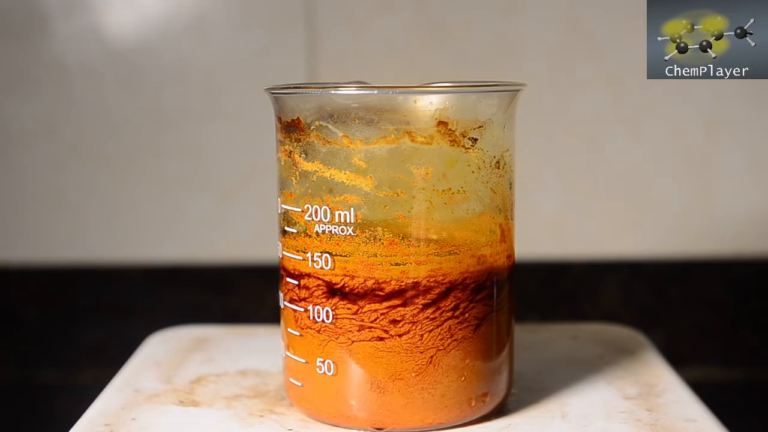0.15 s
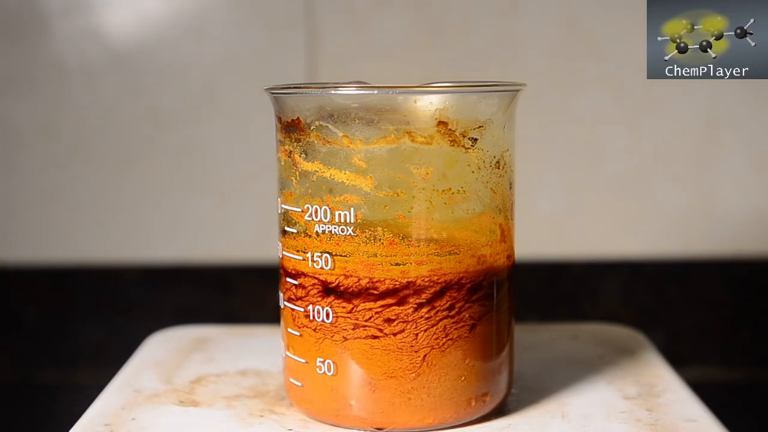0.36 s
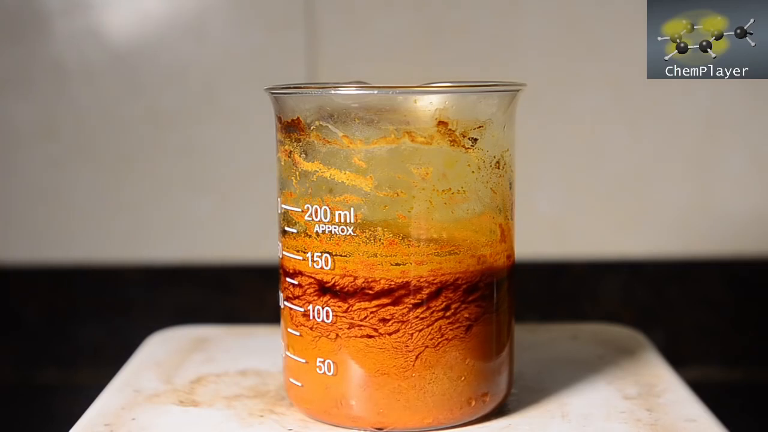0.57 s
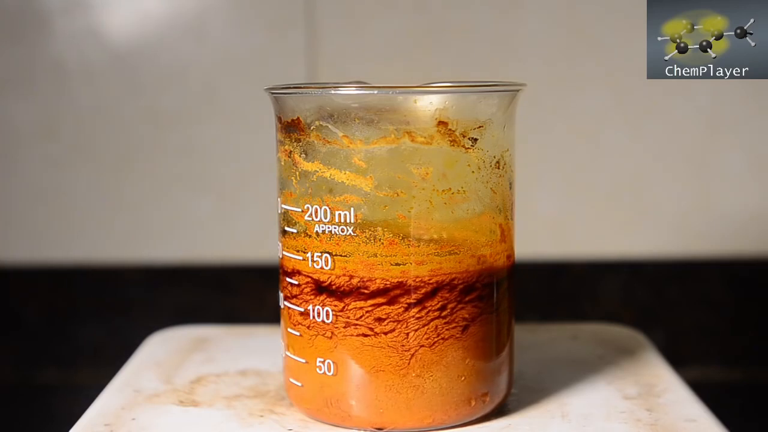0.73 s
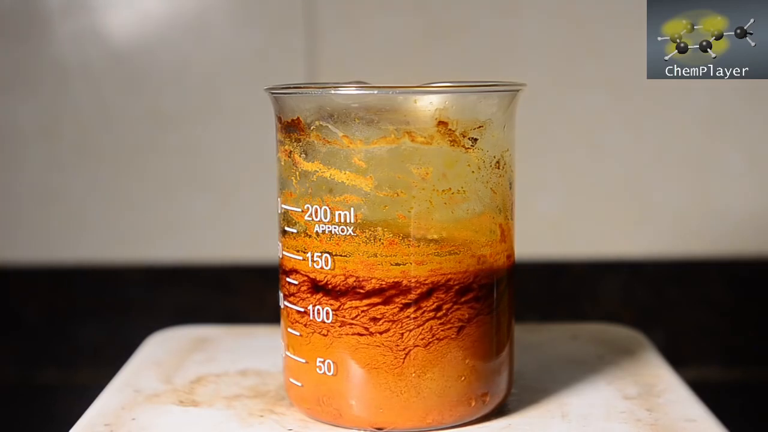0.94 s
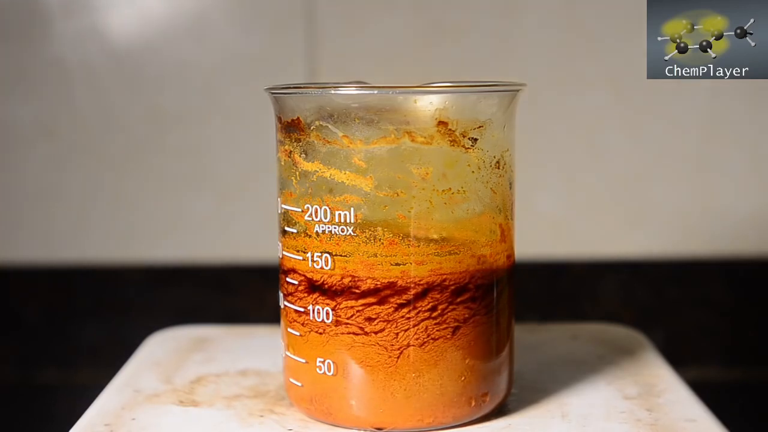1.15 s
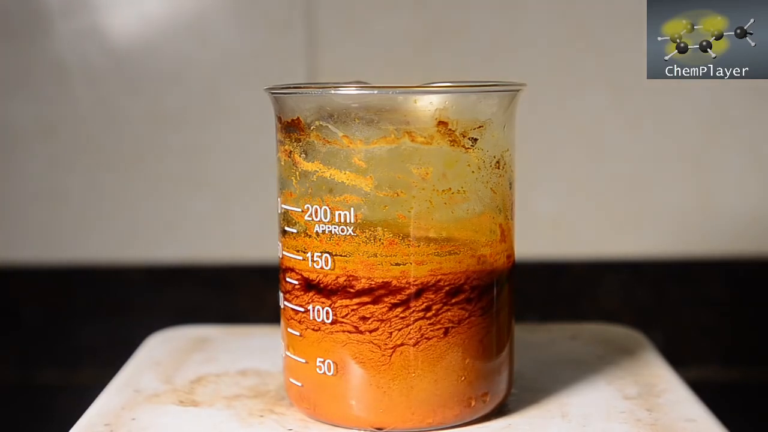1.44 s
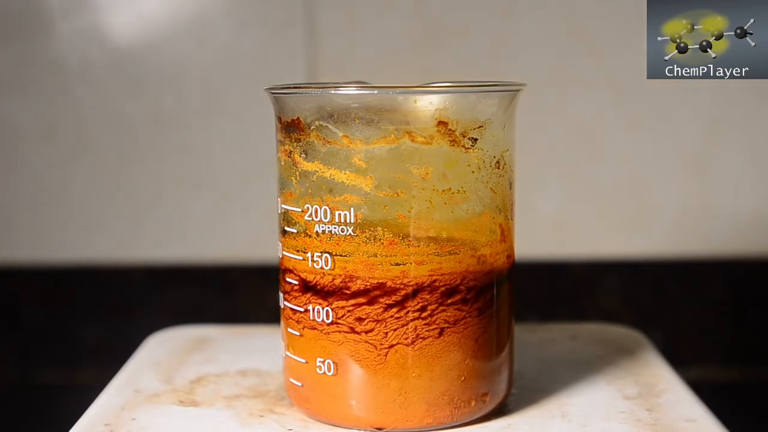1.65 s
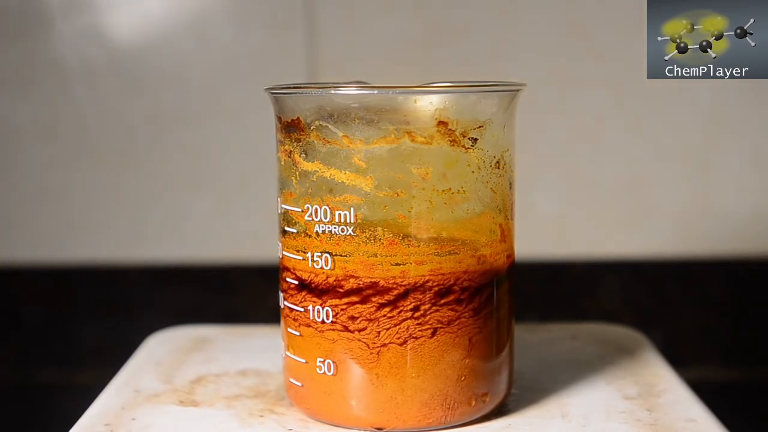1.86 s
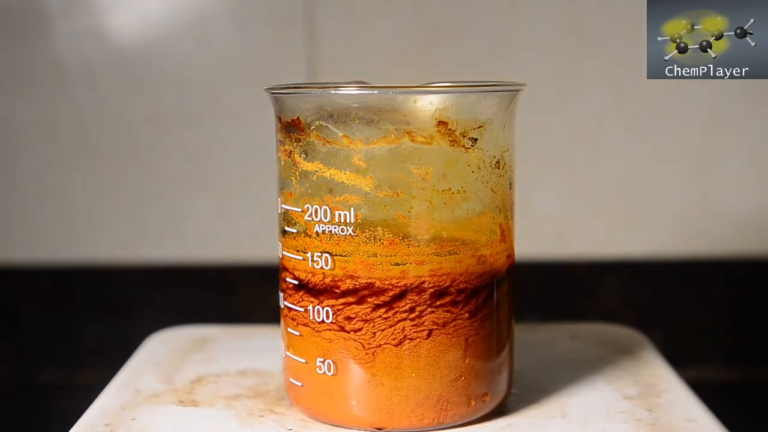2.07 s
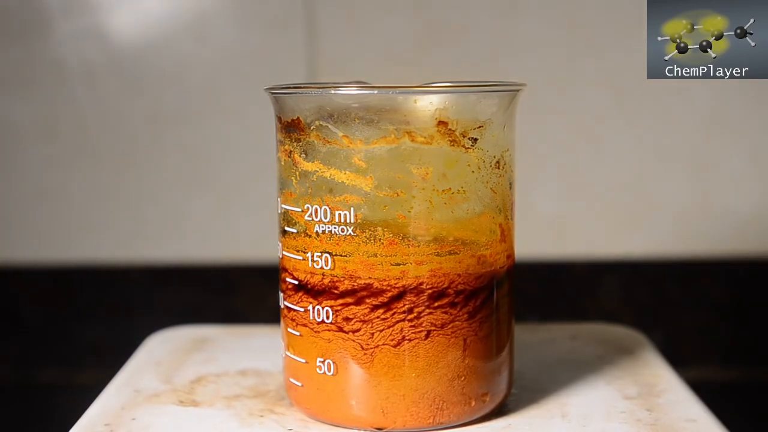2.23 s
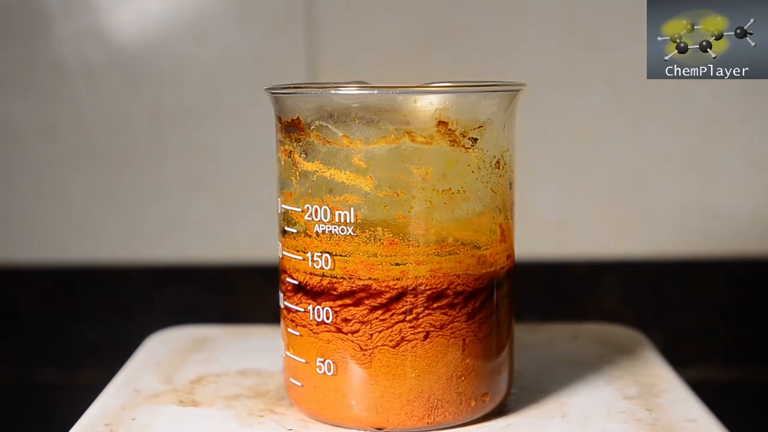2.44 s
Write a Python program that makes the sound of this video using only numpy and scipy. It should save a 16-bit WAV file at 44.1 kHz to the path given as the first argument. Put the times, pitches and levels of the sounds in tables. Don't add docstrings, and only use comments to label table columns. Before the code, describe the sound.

A magnetic stirrer hums and buzzes with loose rattling, then coasts down before a sharp switch click

```python
import sys
import numpy as np
from scipy import signal
from scipy.fft import rfft, irfft, next_fast_len
from scipy.io import wavfile
from scipy.ndimage import map_coordinates

SR = 44100
rng = np.random.default_rng(int(sys.argv[2]) if len(sys.argv) > 2 else 0)


def how_loud(loudness_db):
    steps = np.asarray(loudness_db, float) / 20
    return 10 ** steps


def store_wav(level_fs):
    pcm = np.round(np.clip(np.atleast_2d(level_fs), -1, 1) * 32767)
    wavfile.write(sys.argv[1], SR, pcm.T.astype(np.int16))


N = 114660

OFF_S, OFF_FADE_S = 1.75, 0.012
BUZZ_HZ = 100.47

# f/Hz, bandwidth/Hz, level/dB
HOUSING = [(442.8, 13.5, -3.5), (541.3, 24.2, -0.5), (598, 8.6, -10.5), (796.6, 30, 2), (942, 31, -3),
           (1013, 37, -4), (1070, 38, -3.5), (1304, 87, -5), (1480, 40, -3), (1580, 46, -1),
           (2038, 330, -5.5), (2320, 27.6, 2), (2654, 102, -5.5), (3660, 40, -3.5)]


def unit(x):
    return x / np.sqrt(np.mean(x ** 2) + 1e-20)


def along(points, hz):
    f, v = np.transpose(points)
    return np.interp(np.log(hz + 1), np.log(f + 1), v)


def wobble(rate):
    knots = rng.standard_normal(int(N * rate / SR) + 4)
    return map_coordinates(knots, [np.arange(N) * rate / SR])


def filtered(x, response):
    m = next_fast_len(len(x) + SR // 2)
    return irfft(rfft(x, m) * response(np.fft.rfftfreq(m, 1 / SR)), m)[:len(x)]


def shaped(x, points):
    return filtered(x, lambda f: how_loud(along(points, f)))


def resonances(table):
    def response(f):
        total = 0
        for k, (centre, width, db) in enumerate(table):
            mode = 1j * f * width / (centre ** 2 - f ** 2 + 1j * f * width)
            total = total + (-1) ** k * how_loud(db) * mode
        return total
    return response


def add(track, s, sound):
    part = track[max(round(s * SR), 0):][:len(sound)]
    part += sound[:len(part)]


def hum(t, power):
    # order of the buzz rate, level/dB
    coil = [(.5, -92), (1, -87), (2, -73.5), (3.5, -76), (4, -71), (6, -98), (7, -63), (8, -63.5)]
    # f/Hz, level/dB
    rotor_lines = [(820, -65), (1398.8, -77), (1414.7, -66)]
    lines = [(order * BUZZ_HZ, db) for order, db in coil] + rotor_lines
    total = np.zeros(N)
    for hz, db in lines:
        level = how_loud(db + 4.5 + 2.2 * wobble(5.45))
        total += level * np.sin(2 * np.pi * (hz * t + rng.random()))
    return power * total


def electrics(t, power):
    # f/Hz, bandwidth/Hz, level/dB
    spark = [(10450, 640, -1), (10950, 520, 0), (14350, 300, -15), (7230, 300, -13)]
    # f/Hz, bandwidth/Hz, level/dB
    spark_late = [(10000, 400, -1), (10900, 400, -2), (8000, 400, -8)]
    whine_hz, whine_width_hz = 7242, 180

    beats = np.arange(0.0033, N / SR, 1 / BUZZ_HZ)
    size, late = rng.standard_normal((len(beats), 2)).T
    places = np.round((beats + 0.00006 * late) * SR).astype(int)
    pulses = np.bincount(np.clip(places, 0, N - 1), how_loud(0.9 * size), N)

    def rung(body):
        ring = resonances(body)
        return unit(filtered(pulses, lambda f: ring(f) * np.abs(ring(f)) ** 0.5 * (f > 5000)))

    shift = np.clip((t - OFF_S) / 0.4, 0, 1)
    fizz = (1 - shift) * rung(spark) + shift * rung(spark_late)

    tone = np.sqrt(2) * np.sin(2 * np.pi * whine_hz * t + 1.2 * wobble(250))
    band = resonances([(whine_hz, whine_width_hz, 0)])
    fuzz = unit(filtered(rng.standard_normal(N), lambda f: band(f) ** 2))
    whine = unit(0.6 * tone + 0.4 * fuzz)
    return how_loud(-72 - 5 * (1 - power)) * fizz + how_loud(-73.5) * whine


def rotor(t):
    # f/Hz, level/dB
    rumble = [(300, -12.5), (540, 1.5), (800, -1.5), (1000, -6), (1500, 3), (2300, -7.5), (4000, -17)]
    rattles_per_s, spread_db = 400, 3
    hits = rng.random(N) < rattles_per_s / SR
    strength = how_loud(spread_db * rng.standard_normal(N).clip(-2, 2))
    rattle = hits * strength * np.sign(rng.standard_normal(N))
    drive = shaped(rng.standard_normal(N) + how_loud(-1) * unit(rattle), rumble)
    coast_db = np.clip(-15.5 * (t - OFF_S), -14, 0)
    return how_loud(-51 + coast_db + 0.19 * wobble(9.4)) * unit(filtered(drive, resonances(HOUSING)))


def blows(table, octaves):
    contact_s = 0.002404
    out, t = np.zeros(N), np.arange(SR // 8) / SR
    hz, width, level = np.transpose(HOUSING)[:, :, None]
    modes = np.sin(2 * np.pi * hz * (t - contact_s)) * np.exp(-np.pi * width * t)
    rise = 1 - np.exp(-1.9 * t / contact_s)
    low_share = 0.06 / (1 + (hz / 1500) ** 4)
    for s, db, pitch in table:
        chance = rng.standard_normal((len(hz), 1))
        near = np.exp(-(np.log2(hz / pitch) / octaves) ** 2)
        share = how_loud(level + 2.2 * chance) * (low_share + near)
        ring = (share * modes).sum(0) * rise
        add(out, s - contact_s / 2, how_loud(db) * ring / np.abs(ring).max())
    return out


def loose_parts():
    # t/s, peak level/dB, f/Hz
    knocks = [(0.003, -29, 954), (0.135, -37, 1020), (0.29, -28.5, 982), (0.542, -39, 1070),
              (0.565, -44, 1090), (0.618, -28, 1094), (0.722, -42, 1140), (0.844, -42, 942),
              (0.943, -44.5, 1110), (1.256, -42.5, 1070), (1.315, -32, 1070), (1.368, -39, 1070),
              (1.389, -34.5, 1050), (1.396, -35.5, 1060), (1.41, -37, 1010), (1.439, -32.5, 990),
              (1.516, -42, 945), (1.733, -29.5, 1060), (1.798, -48, 1090), (1.825, -33, 1070),
              (1.842, -37.5, 980), (1.854, -39, 960), (1.877, -36, 970), (1.93, -42.5, 1070),
              (1.991, -42, 1070), (2.232, -37.5, 1045), (2.339, -46.5, 896), (2.547, -48.5, 930)]
    # t/s, peak level/dB, f/Hz
    thuds = [(0.628, -58, 540), (1.448, -44.5, 550), (1.862, -43.5, 533), (1.928, -45.5, 480),
             (1.984, -46.5, 520), (2.065, -44.5, 654), (2.076, -41, 532), (2.144, -39.5, 586),
             (2.164, -51.5, 493), (0.012, -45.5, 545), (2.259, -44, 630), (2.287, -52.5, 550),
             (2.005, -47, 530), (2.03, -49, 530), (1.94, -45.5, 526), (2.11, -52, 547), (2.345, -50, 560)]
    # t/s, peak level/dB, f/Hz
    pings = [(0.1381, -47.5, 2310), (0.7213, -50.5, 2300), (0.9847, -50, 2310), (1.0171, -59, 2320),
             (1.5189, -44.5, 2320), (1.9344, -51, 2310)]
    # t/s, peak level/dB, f/Hz
    clacks = [(.617, -36, 1510), (1.013, -39.5, 1520), (2.048, -41.5, 1660), (2.232, -40, 1660),
              (2.25, -46, 890), (2.236, -55, 2300), (2.452, -41.5, 980)]
    narrow, broad = 0.12, 0.28
    return blows(knocks, narrow) + blows(thuds, broad) + blows(pings, narrow) + blows(clacks, narrow)


def grit():
    # t/s, level/dB, f/Hz
    specks = [(.002, -51.5, 4230), (.539, -49, 3440), (.631, -59, 11000), (.956, -56, 3700),
              (1.009, -43.5, 2920), (1.219, -49, 3600), (1.25, -46, 2700), (1.514, -43, 3100),
              (1.516, -49, 2600), (1.528, -55, 3700), (1.825, -55, 3300), (1.854, -55, 7500),
              (2.076, -57, 8000), (1.854, -55, 4000), (1.927, -51, 3600), (1.928, -41, 2260),
              (1.988, -51, 3470), (2.027, -52, 3380), (2.034, -58, 3670), (2.232, -49, 1900),
              (2.293, -50, 3900), (2.298, -48, 2800), (2.327, -54, 5000), (2.328, -53, 3400),
              (2.391, -61, 5600),
              (.291, -51, 1500), (.618, -42, 1600), (1.316, -44, 1600), (1.734, -43, 1700), (.5, -45, 1800),
              (.75, -40, 1900), (2.068, -43, 850), (2.255, -50, 800)]
    octaves, t60_s = 0.36, 0.024
    out, t = np.zeros(N), np.arange(SR // 16) / SR
    for s, db, pitch in specks:
        noise = rng.standard_normal(len(t))
        burst = unit(filtered(noise, lambda f: np.exp(-(np.log2((f + 1) / pitch) / octaves) ** 2)))
        rise = 1 - np.exp(-t / 0.0012)
        add(out, s, how_loud(db - 2 - 60 * t / t60_s) * rise * burst)
    return out


def switch():
    # t/s, peak level/dB, brightness f/Hz
    snap = [
        (2.4078, -8.5, 16000),
        (2.4098, -17, 6000),
        (2.4132, -23, 6000),
        (2.4225, -21, 3500),
        (2.4495, -35, 10000),
        (2.4545, -30, 5000),
    ]
    # f/Hz, level/dB, decay t60/s
    switch_modes = [(508, -8, .13), (850, -7, .055), (1310, -15, .05), (1475, -14, .06), (1950, -5, .05),
                    (2210, -1, .07), (2400, -4, .09), (2605, -3, .06), (2950, -14, .11), (3889, -5, .045),
                    (4498, -9, .035), (5320, -8, .035), (2120, 1, .016), (10300, 0, .014)]
    # f/Hz, level/dB
    crack_colour = [(400, -30), (700, -18), (1650, -22), (2300, 0), (3100, -13), (4200, -6), (8000, -11),
                    (11500, -5)]
    # f/Hz, level/dB
    echo = [(300, -31), (600, -1.5), (1500, -11.5), (2400, 0), (3200, -5.5), (4500, -8), (8000, -11),
            (11000, -18.5)]
    modes, cracks, t = np.zeros(N), np.zeros(N), np.arange(SR // 5) / SR
    for s, db, top_hz in snap:
        ring = np.zeros(len(t))
        for hz, level, t60 in switch_modes:
            decay = how_loud(level - 60 * t / t60) / (1 + (hz / top_hz) ** 4)
            roughness = 0.45 * wobble(106)[:len(t)]
            ring += decay * np.sin(2 * np.pi * hz * t + roughness)
        noise = unit(shaped(rng.standard_normal(len(t)), crack_colour))
        noise = filtered(noise, lambda f: 1 / (1 + (f / top_hz) ** 4))
        rise = how_loud(db) * (1 - np.exp(-t / 0.0003))
        crack = how_loud(-6.5 - 60 * t / 0.032)
        rustle = how_loud(-19.5 - 60 * t / 0.11)
        add(modes, s, rise * how_loud(-15) * ring)
        add(cracks, s, rise * noise * (crack + rustle))

    def thin(f):
        x = f / 405
        return ((1j * x) ** 2 / (1 + 1j * x * np.sqrt(2) - x ** 2)) ** 2

    impulse = 1.0 * (np.arange(N) == round(snap[0][0] * SR))
    return filtered(modes, thin), filtered(cracks, thin), shaped(impulse, echo)


def lab(x):
    # f/Hz, t60/s
    decay_times = [(300, 0.12), (2500, 0.59), (7000, 0.45), (11000, 0.63), (14000, 0.33)]
    hz, t, z = signal.stft(rng.standard_normal(SR // 2), SR, nperseg=256)
    decay = how_loud(-60 * t / along(decay_times, hz)[:, None])
    tail = signal.istft(z * decay, SR, nperseg=256)[1]
    delayed = np.pad(x, (250, 0))
    return signal.fftconvolve(delayed, tail / np.linalg.norm(tail))[:N]


def room_air():
    # f/Hz, level/dB
    air_colour = [(25, -9.5), (100, -1.5), (250, 2), (500, -2), (1000, -1), (2200, -9), (7000, -20),
                  (15000, -21)]
    return how_loud(-57) * unit(shaped(rng.standard_normal(N), air_colour))


def notched(x):
    # f/Hz, bandwidth/Hz, depth (0-1)
    notches = [(5780, 200, .75), (6900, 70, .7)]
    return filtered(x, lambda f: np.prod([1 - d * np.exp(-((f - c) / w) ** 2) for c, w, d in notches], axis=0))


def scene():
    t = np.arange(N) / SR
    power = 1 / (1 + np.exp(np.clip((t - OFF_S) / OFF_FADE_S, -50, 50)))
    machine = hum(t, power) + electrics(t, power)
    plate = loose_parts() + grit()
    ring, crack, bang = switch()
    wet = lab(how_loud(2) * bang + how_loud(-24) * ring + how_loud(-19.5) * plate)
    noise = notched(rotor(t) + room_air())
    return (machine + plate + ring + crack + wet + noise)[None]


def low_pass(x):
    return signal.sosfilt(signal.butter(12, 15860, fs=SR, output="sos"), x)


def record(dry):
    # f/Hz, level/dB
    mic = [(4800, 1), (6600, 0), (9600, -3.5), (11000, -2), (12300, -10.5), (14950, -14), (15150, -42),
           (16500, -38)]
    mix = shaped(dry[0], mic)[None]
    return low_pass(mix)


dry = scene()
out = record(dry)
store_wav(out)
```